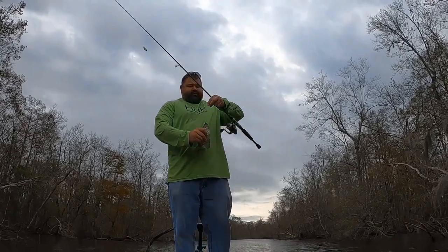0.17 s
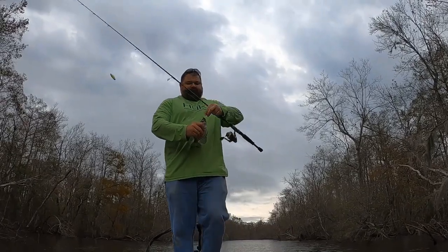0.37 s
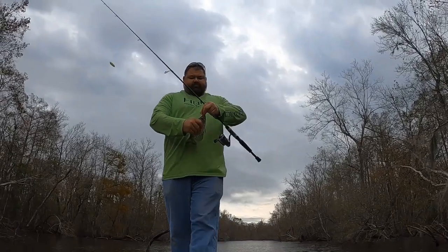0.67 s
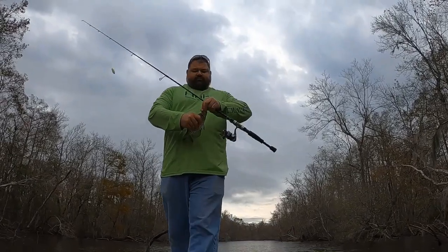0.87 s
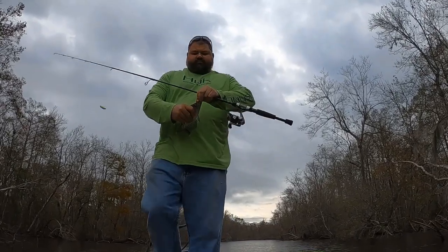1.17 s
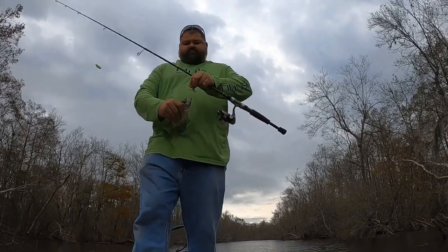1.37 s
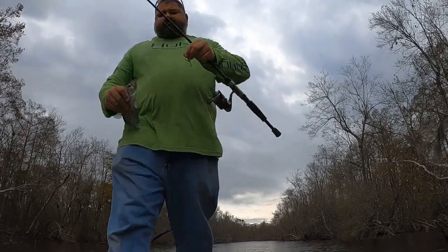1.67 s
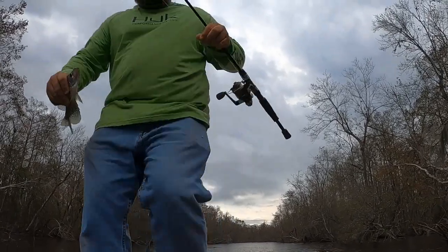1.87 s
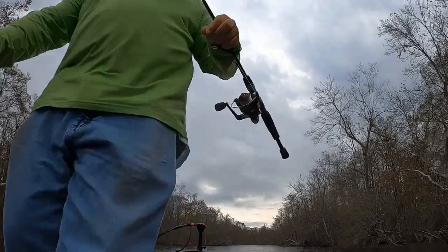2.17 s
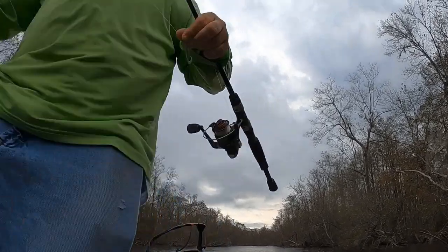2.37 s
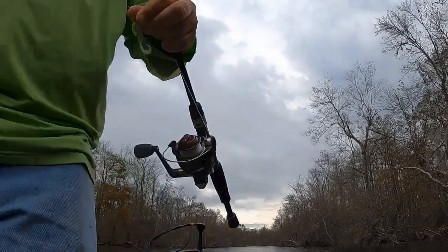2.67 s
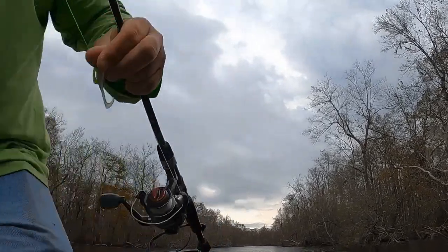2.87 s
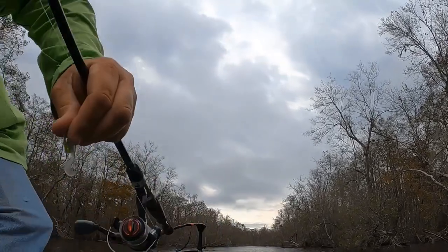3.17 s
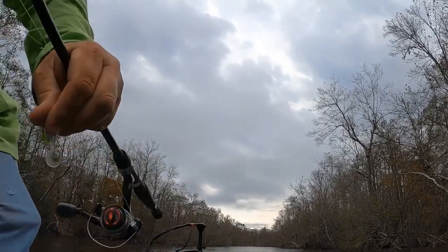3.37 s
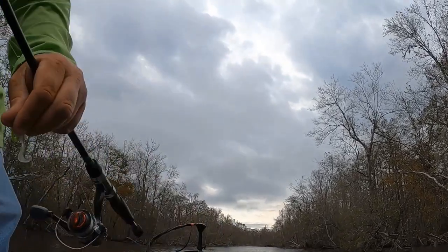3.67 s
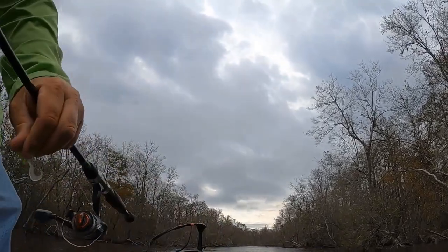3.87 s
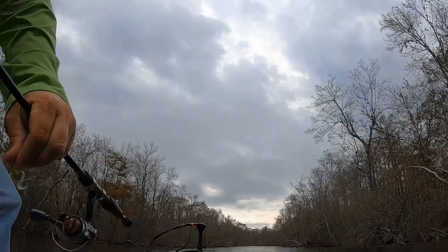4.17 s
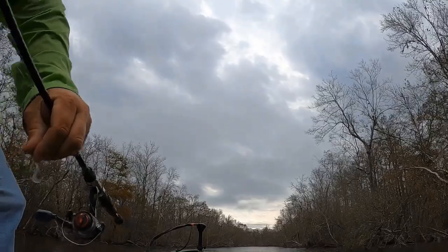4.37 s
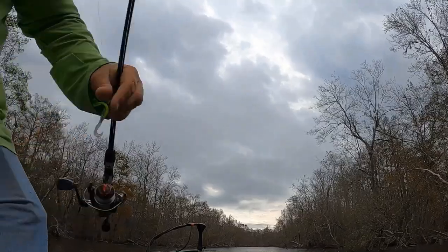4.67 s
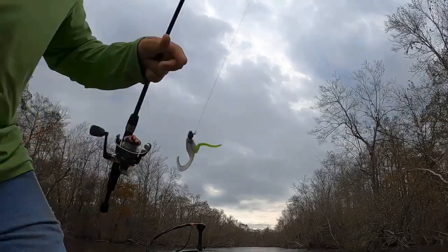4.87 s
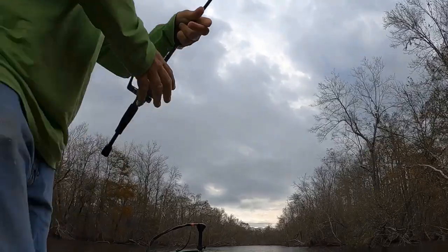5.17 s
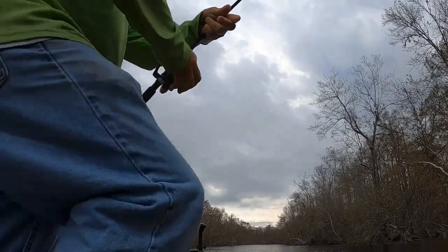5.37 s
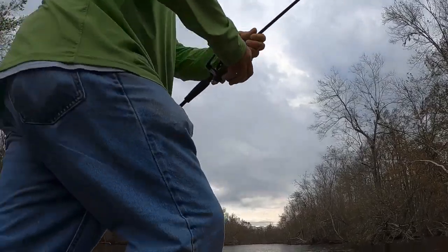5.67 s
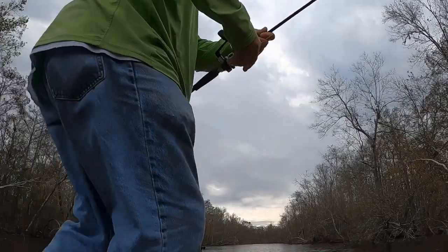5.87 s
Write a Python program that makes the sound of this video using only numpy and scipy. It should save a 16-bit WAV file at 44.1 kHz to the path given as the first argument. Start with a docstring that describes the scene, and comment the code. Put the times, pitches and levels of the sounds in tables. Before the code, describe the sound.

A microphone low on a boat deck picks up faint wind buffeting and a very soft hiss of trees. Spaced footsteps approach and thump the hollow hull, with cloth rustle and small rod and reel clicks. After a brief lull, louder woody knocks and bright rattling cluster at the left, then more knocks and shuffling, a short quieter gap and a last double knock, dry and open.

```python
"""Wind rumbles on the microphone and trees on the banks hiss faintly throughout, as shaped noise.
At first eddies flutter (low sines) among faint tackle clicks, while clothes stir (high noise).
From 1 s an angler walks down a small boat's deck past a camera: decaying modes and noise make each step
crack and boom in the hollow hull, noise swells make scuffs, rustles and hull rumbles.
Rummaging to the left then brings denser knocks, clicks and rattles, made as short coloured rings."""
import sys
import numpy as np
from scipy import signal
from scipy.fft import rfft, irfft, next_fast_len
from scipy.io import wavfile
from scipy.ndimage import map_coordinates

SR = 44100
rng = np.random.default_rng(int(sys.argv[2]) if len(sys.argv) > 2 else 0)


def unload_audio(sound):
    """Save the sound as a 16-bit wav file, at the path given as the first command line argument."""
    columns = np.transpose(np.atleast_2d(sound))
    # keep every value between -1 and 1, then stretch to whole-number steps
    steps = np.round(np.clip(columns, -1, 1) * 32767)
    wavfile.write(sys.argv[1], SR, steps.astype(np.int16))


N = 265349
TIME = np.arange(N) / SR
BLOW = SR // 4  # samples that one blow lasts
LEAD = SR // 25  # samples before contact, where things already brush each other
AGE = (np.arange(BLOW) - LEAD) / SR  # s from contact
SINCE = np.maximum(AGE, 0)

# steps and knocks: t/s, panel level/dB, panel f/Hz, hull boom level/dB, hull f/Hz,
# crack level/dB, crack f/Hz, treble level over the crack/dB; all levels relative
KNOCK_EVENTS = [(1.046, -34, 185, -26.5, 95, -34.5, 1490, -16.5), (1.104, -60, 160, -42, 79, -66, 940, 1),
                (1.758, -36.5, 173, -34, 58, -31, 1220, -9.5), (1.79, -49, 270, -30.5, 45, -59.5, 985, 1),
                (2.379, -33.5, 197, -60, 138, -48, 890, 1), (2.388, -33, 193, -61, 138, -40, 1860, -8),
                (2.414, -39.5, 179, -50, 90.5, -48, 1730, -4), (2.459, -42, 152, -22, 45.5, -54.5, 970, 4),
                (2.491, -41, 153, -23, 43.4, -52, 950, -22), (2.852, -34.5, 304, -18.5, 90.4, -38, 640, -9),
                (2.886, -35.5, 139, -23.5, 73.7, -40.5, 890, -6.5),
                (2.974, -70, 152, -33, 89.3, -65, 1820, 14), (3.124, -63, 198, -56, 100, -56.5, 700, -18),
                (3.338, -23, 374, -32, 92, -32.5, 540, -20),
                (3.434, -22.5, 200, -23.5, 86, -33.5, 1510, -14.5),
                (3.51, -36.5, 204, -47, 57, -40.5, 1290, -13), (3.698, -45, 211, -68, 127, -51, 1080, 4),
                (4.279, -27, 323, -49, 133, -24.5, 970, -12),
                (4.358, -19.5, 261.4, -36.5, 105, -28, 910, -3.5),
                (4.406, -35.5, 481, -53, 95.5, -34, 990, -18),
                (4.437, -22.5, 263, -52, 125, -28.5, 1760, -4),
                (4.446, -26.5, 222, -20, 104, -37, 1240, -20), (4.642, -49, 187, -39.5, 94, -68, 1000, -9),
                (4.728, -35, 242, -43, 108, -29, 880, -13), (4.775, -30, 210, -39, 108, -27, 1180, -3),
                (4.838, -28.5, 470, -50, 90, -27.5, 850, -8),
                (5.129, -46.5, 199, -40.5, 105.6, -55, 1080, -1), (5.161, -69, 162, -39, 77, -58, 1000, -7),
                (5.295, -26.5, 181.6, -28.5, 148, -38, 920, -4),
                (5.351, -24.5, 214, -24.5, 130, -34, 890, -4.5),
                (5.412, -27.5, 474, -33.5, 102, -30, 900, -14.5),
                (5.921, -30, 182, -37, 83.4, -27, 1310, -12.5),
                (5.931, -35.5, 330, -48, 82, -31.5, 734, -25)]
# decay of the struck deck: f/Hz, t60/s
DECK_DECAY = [(150, 0.26), (500, 0.15), (1500, 0.11), (4000, 0.055), (10000, 0.019)]
# spectrum of the panel's crowded modes: f/Hz, level/dB
PANEL_SPECTRUM = [(70, -27.5), (140, -6), (260, 0), (480, -3), (700, -24), (1400, -68)]
# spectrum of the crack's middle: f/Hz, level/dB
CLACK_SPECTRUM = [(300, -40.5), (600, 3.5), (760, 2), (1300, -5), (2200, -6), (3200, -9), (6000, -37)]
# spectrum of the treble edge of hard contacts, in knocks and clicks: f/Hz, level/dB
EDGE_SPECTRUM = [(1400, -54.5), (2600, 2.5), (4400, 9), (6000, -10.5), (9000, -20)]
# spectrum of the highest treble of hard contacts, in knocks and clicks: f/Hz, level/dB
SPARKLE_SPECTRUM = [(3500, -14.5), (5800, 4), (9000, -3.5), (12000, -13), (15500, -22)]
# onset time/s of an even blow, and dB of onset time per dB of softness (panel over crack)
CONTACT_S, SOFTENING = 0.0013, 0.45


def knocks():
    """Modal superposition: a blow cracks on the deck, rings its panel and booms in the hull."""
    track = np.zeros((2, N))
    for s, panel_db, panel_hz, boom_db, hull_hz, crack_db, clack_hz, treble_db in KNOCK_EVENTS:
        contact_s = CONTACT_S * amp(SOFTENING * (panel_db - crack_db))  # soft blows start more slowly
        # deep hull modes last longer
        boom = amp(boom_db - 2.0) * mode(hull_hz, t60=11.6 / hull_hz, rise_s=0.0033)

        low_board = 0.36 * mode(410.7, t60=0.043, rise_s=0.0022)
        high_board = 0.36 * mode(493, t60=0.036, rise_s=0.002)
        boards = (low_board + high_board) * panel_hz / 400  # stronger with a higher panel pitch
        panel_own = [(panel_hz, 110, 7)]
        crowd = 0.5 * dense_ring(PANEL_SPECTRUM, DECK_DECAY, contact_s, snap=3.3, brush=0.1, own=panel_own)
        ring = mode(panel_hz, t60=0.075, rise_s=0.002) + boards + crowd
        panel = amp(panel_db - 1.5) * unit_hit(ring)

        clack_own = [(clack_hz, 330, 9)]
        clack = dense_ring(CLACK_SPECTRUM, DECK_DECAY, contact_s, snap=4.9, brush=0.24, own=clack_own)
        edge = dense_ring(EDGE_SPECTRUM, DECK_DECAY, contact_s, snap=1.6, brush=0.12)
        sparkle = dense_ring(SPARKLE_SPECTRUM, DECK_DECAY, contact_s, snap=1.2, brush=0.16)
        treble = amp(treble_db) * (amp(-10.0) * edge + amp(-20.0) * sparkle)
        crack = amp(crack_db) * (amp(-5.5) * clack + treble)
        add(track, s, boom + panel + crack)
    return track


# clicks of rod, reel and loose tackle: t/s, relative level/dB, ring f/Hz, t60 at the ring pitch/s
CLICK_EVENTS = [(0.167, -65, 1510, 0.027), (0.316, -63, 2300, .06), (.416, -55.5, 1750, 0.13),
                (1.031, -52, 1700, 0.081), (1.1358, -54.5, 3650, 0.11), (1.2029, -52, 1520, 0.093),
                (1.228, -61, 1710, 0.025), (1.347, -50, 3900, .06), (1.421, -34, 4730, 0.054),
                (1.5212, -56.5, 2560, .06), (1.6304, -42.5, 2050, 0.18), (1.752, -39, 2300, 0.041),
                (1.9088, -35, 1820, 0.038), (2.0703, -44.5, 1890, 0.089), (2.135, -59, 1580, 0.11),
                (2.2349, -43, 2720, 0.12), (2.39, -36.5, 1870, 0.048), (2.432, -36.5, 2670, 0.078),
                (2.955, -38, 7000, 0.064), (3.1188, -59, 1790, 0.069), (3.4338, -37, 1460, 0.14),
                (3.7698, -38.5, 2010, 0.086), (3.7861, -27, 4500, 0.061), (4.1, -53, 2130, 0.087),
                (4.204, -32.5, 2690, 0.104), (4.215, -30.5, 5400, 0.027), (4.3008, -22, 2780, 0.067),
                (4.3178, -35.5, 3320, 0.079), (4.4427, -29, 2270, 0.11), (4.5025, -36.5, 4970, 0.075),
                (4.6176, -28.5, 2100, 0.12), (4.6401, -32.5, 2570, 0.045), (4.7619, -34, 1900, 0.11),
                (4.7855, -22.5, 2340, 0.08), (4.85, -31.5, 4000, 0.13), (4.8607, -27.5, 5200, 0.075),
                (4.8843, -23, 3130, 0.071), (4.9353, -32.5, 2680, 0.097), (4.9656, -32, 2420, 0.064),
                (5.068, -39.5, 2830, 0.068), (5.1817, -38, 1690, 0.13), (5.2157, -42, 2140, 0.049),
                (5.288, -40, 1840, 0.21), (5.3963, -30.5, 4700, 0.091), (5.4128, -26.5, 2780, 0.056),
                (5.5118, -37, 1620, 0.12), (5.5561, -31.5, 1520, 0.074), (5.824, -50.5, 3540, .05)]
# how tackle decay varies with pitch, before each click rescales it: f/Hz, relative t60/s
TACKLE_DECAY = [(800, 0.2), (2500, 0.098), (10000, 0.06)]
# registers in the order body, edge, sparkle: centre f/Hz, relative level at the centre/dB
REGISTER_LEVELS = [(1700, -1), (4000, 0.5), (7000, -3)]
# spectrum of a click's body: f/Hz, level/dB
BODY_SPECTRUM = [(200, -6), (600, -0.5), (1400, -4), (2300, -2.5), (3500, -3), (7000, -75)]
FADE_DB_PER_OCTAVE = 9.5  # a register fades as the ring pitch leaves its centre
RING_WIDTH, RING_DB = 0.31, 4.5  # a part's own resonance: width over pitch, and lift in dB
CONTACT_SHARE = 0.0047  # onset time of a click over its t60, before the floor in dense_ring


def tackle():
    """Impact excitation: small hard parts snap brightly, coloured by their own short resonance."""
    track = np.zeros((2, N))
    for s, db, ring_hz, t60 in CLICK_EVENTS:
        body_db, edge_db, sparkle_db = [
            top_db - FADE_DB_PER_OCTAVE * abs(np.log2(ring_hz / hz)) for hz, top_db in REGISTER_LEVELS]
        t60s = np.array(TACKLE_DECAY) * [1, t60 / along(TACKLE_DECAY, ring_hz)]
        contact_s = CONTACT_SHARE * t60
        own = [(ring_hz, RING_WIDTH * ring_hz, RING_DB)]
        body = dense_ring(BODY_SPECTRUM, t60s, contact_s, snap=1.0, brush=0.18, own=own)
        edge = dense_ring(EDGE_SPECTRUM, t60s, contact_s, snap=0.51, brush=0.15, own=own)
        sparkle = dense_ring(SPARKLE_SPECTRUM, t60s, contact_s, snap=0.73, brush=0.26)
        click = amp(body_db - 6.0) * body + amp(edge_db - 12) * edge + amp(sparkle_db - 10.0) * sparkle
        add(track, s, amp(db) * click)
    return track


# the boat sways as weight shifts, and the hull rumbles: peak t/s, relative level/dB, rise to peak from 1/e/s
SWAY_EVENTS = [(.98, -50, .04), (1.08, -33, 0.066), (1.8, -44.5, 0.073), (1.92, -42, 0.053),
               (2.42, -35.5, 0.1), (2.57, -44.5, 0.088), (2.97, -47, .08), (3.45, -47, 0.11),
               (4.03, -48, 0.06), (4.26, -44, 0.046), (4.44, -35, .05), (4.72, -59, .1),
               (5.8, -40.5, 0.023), (6, -39.5, 0.036)]
# soles scuff over the deck: peak t/s, relative level/dB, rise to peak from 1/e/s
SCUFF_EVENTS = [(.46, -63, 0.1), (1.08, -64, 0.12), (1.68, -56.5, 0.049), (1.84, -56, 0.09),
                (2.3, -59, 0.12), (2.41, -46, 0.064), (2.52, -60, 0.062), (3.52, -51.5, 0.05),
                (3.77, -48.5, 0.042), (4.355, -36, 0.024), (4.44, -43.5, 0.054), (4.69, -52, 0.074),
                (4.83, -40, 0.077), (4.98, -49.5, 0.084), (5.27, -54.5, 0.085), (5.35, -42.5, 0.039),
                (5.43, -42, 0.061), (5.78, -59.5, 0.082), (5.955, -53.5, 0.032)]
# sleeves and trousers brush past: peak t/s, relative level/dB, rise to peak from 1/e/s
BRUSH_EVENTS = [(.04, -65, 0.01), (.53, -72.5, 0.19), (2.98, -57, 0.062), (3.635, -54, 0.041),
                (3.72, -54, 0.025), (4.23, -45, .025), (5.25, -49.5, 0.033), (5.58, -51.5, 0.02),
                (5.76, -55.5, 0.056)]
# clothes stir all the time: t/s, relative level/dB
STIRRING_LEVEL = [(0, -76), (1.45, -77.5), (1.7, -65.5), (2.2, -68), (2.7, -66), (3.3, -65), (4.55, -69),
                  (5.1, -63.5), (5.7, -60.5), (6, -70.5)]
# spectrum of hull rumble and wind buffeting: f/Hz, level/dB
RUMBLE_SPECTRUM = [(12, -30.5), (27, -3.5), (40, 4.5), (52, 1.5), (70, -0.5), (110, -7.5), (170, -13),
                   (400, -62.5)]
# spectrum of the creaking deck: f/Hz, level/dB
CREAK_SPECTRUM = [(80, -21), (150, -2.5), (210, -2), (300, -8.5), (480, -17), (700, -29.5), (1500, -42.5)]
# spectrum of soles and the low part of rubbing cloth: f/Hz, level/dB
SCUFF_SPECTRUM = [(300, 5), (600, -3), (1200, -7), (2300, -3.5), (3500, -13.5), (7000, -57)]
# spectrum of hissing cloth: f/Hz, level/dB
CLOTH_SPECTRUM = [(1300, -27), (2600, 2.5), (4400, 5.5), (6000, -2.5), (8500, -5.5), (10000, -12),
                  (12500, -16), (15500, -43)]
MURMUR_DB = -66.5  # steady part of the creaking, relative
# a scuff also makes the deck creak and the trouser leg hiss; a sway creaks too (dB over each)
SCUFF_CREAK_DB, SCUFF_HISS_DB, SWAY_CREAK_DB = 4, -11, -22.5
BRUSH_BODY_DB, STIR_BODY_DB = 6, 1  # low part of a brush and of the stirring, dB over the envelope


def movement():
    """Friction noise: shifting weight stirs hull and deck, soles scuff and cloth rubs."""
    sway, scuffing, brushing = swells(SWAY_EVENTS), swells(SCUFF_EVENTS), swells(BRUSH_EVENTS)
    stirring = amp(curves(STIRRING_LEVEL, TIME)[0])
    left_db, = curves(LEFTWARD, TIME)
    creaking = together(amp(MURMUR_DB), amp(SCUFF_CREAK_DB) * scuffing, amp(SWAY_CREAK_DB) * sway)
    rubbing = together(scuffing, amp(BRUSH_BODY_DB) * brushing, amp(STIR_BODY_DB) * stirring)
    hissing = together(brushing, stirring, amp(SCUFF_HISS_DB) * scuffing)

    # the image leans least in the hull and deck, most of all in the scuff
    hull = sway * rush(RUMBLE_SPECTRUM, grain_db=-1.5, grain_rate=8.7) * pan(0.08 * left_db)
    deck = creaking * rush(CREAK_SPECTRUM, grain_db=4.0, grain_rate=44) * pan(0.12 * left_db)
    scuff_noise = rush(SCUFF_SPECTRUM, grain_db=0.5, grain_rate=59, catches=46, catch_share=1.0)
    scuff = amp(-1.05) * rubbing * scuff_noise * pan(left_db)
    cloth_noise = rush(CLOTH_SPECTRUM, grain_db=1.0, grain_rate=210, catches=140, catch_share=0.57)
    cloth = hissing * cloth_noise * pan(0.52 * left_db)
    strokes = unit(amp(2.76 * wobble(24)))  # rubbing comes in short uneven strokes
    return hull + deck + strokes * (scuff + cloth)


# eddies that hit one microphone port harder: t/s, relative level/dB, f/Hz, left minus right/dB
EDDY_EVENTS = [(0.275, -40.5, 62.4, 15), (0.356, -37.5, 69, 11), (0.451, -41, 96, 2), (0.644, -37, 51, 8),
               (0.95, -33.5, 64, 14), (1.001, -39, 60, 16), (1.34, -39.5, 61, 10), (3.962, -42, 58.5, -18)]
# spectrum of the trees' hiss: f/Hz, level/dB
TREE_SPECTRUM = [(200, -29), (700, 7.5), (1500, 11.5), (3000, -5.5), (5600, -5), (8500, -9.5), (11000, -21),
                 (15000, -42)]
BUFFET_DB, GUST_DB = -54.5, 6.5  # steady wind level, and its random swing


def wind(eddy_s=0.019):
    """Turbulence: wind rumbles on the ports, eddies shake them for a few cycles, far trees hiss."""
    trees = unit(filtered(stereo_noise(N), lambda hz: amp(along(TREE_SPECTRUM, hz))))
    buffeting = rush(RUMBLE_SPECTRUM, grain_db=GUST_DB, grain_rate=8.7) * pan(left_db=2)
    air = amp(-75) * trees + amp(BUFFET_DB) * buffeting
    for s, db, hz, left_db in EDDY_EVENTS:
        flutter = np.sin(2 * np.pi * hz * (TIME - s) + 1.9 * wobble(60))  # phase wanders
        envelope = np.exp(-((TIME - s) / eddy_s) ** 2)
        air += amp(db - 3) * pan(left_db) * flutter * envelope
    return air


# resonances of the deck and its fittings: f/Hz, width/Hz, relative lift/dB
FITTING_MODES = [(469.4, 23, 4), (850, 77, 0.5), (978, 72, 4.5), (1267, 290, 5), (1700, 720, 4),
                 (2490, 80, -0.5), (3410, 290, -1.5), (4360, 730, -3.5)]


def dense_ring(colour, t60s, contact_s, snap, brush, own=()):
    """Statistical modal overlap: a faint brush, a contact burst, then decay at each frequency's own rate."""
    hz, t, z = signal.stft(stereo_noise(BLOW), SR, nperseg=256)
    fade = amp(-60 * np.maximum(t - LEAD / SR, 0) / along(t60s, hz)[:, None])
    tail = signal.istft(z * fade, SR, nperseg=256)[1][:, :BLOW]
    onset = 1 - np.exp(-SINCE / max(contact_s, 1e-4))
    contact = onset * (1 + snap * np.exp(-SINCE / 0.001))
    flicker = map_coordinates(rng.standard_normal(size=150), [SINCE * 260], mode="wrap")
    chatter = amp(1.37 * flicker)  # loose parts rattle on
    brushing = brush * np.exp(-np.abs(AGE) / 0.0094)
    struck = tail * (contact * chatter + brushing)
    gain = lambda hz: colour_gain(colour, hz) * amp(lift_db([*FITTING_MODES, *own], hz) + spot_db(hz))
    return unit_hit(filtered(struck, gain, causal=True))


def mode(hz, t60, rise_s):
    """Damped oscillator: one resonance swells as the blow spreads, then decays exponentially."""
    decay = np.exp(-np.log(1000) * SINCE / t60)
    rise = (1 - np.exp(-SINCE / rise_s)) ** 2
    return unit_hit(np.sin(2 * np.pi * hz * SINCE) * decay * rise)


def rush(colour, grain_db, grain_rate, catches=0, catch_share=0):
    """Stick-slip: rms-1 noise of uneven sliding, plus sudden catches (mean number a second)."""
    sliding = unit(amp(grain_db * wobble(grain_rate)))
    slips = (rng.random(N) < catches / SR) * rng.uniform(0.18, 1, N)
    slips = signal.lfilter([1], [1, -np.exp(-1 / (0.013 * SR))], slips)  # each falls to 1/e in 13 ms
    grains = stereo_noise(N) * (sliding + catch_share * unit(slips))
    gain = lambda hz: colour_gain(colour, hz) * amp(0.92 * lift_db(FITTING_MODES, hz))
    return unit(filtered(grains, gain, causal=True))


RELEASE, SWELL_SHAPE = 1.28, 1.27  # fall over rise in length; shape 1 = pointed, 2 = round


def swells(rows):
    """Energy summation: movements that each build to a peak and ebb add in power."""
    power = np.zeros(N)
    for s, db, rise_s in rows:
        near = np.abs(TIME - s) < 8 * rise_s
        u = (TIME[near] - s) / rise_s
        power[near] += (amp(db) * np.exp(-np.maximum(-u, u / RELEASE) ** SWELL_SHAPE)) ** 2
    return np.sqrt(power)


def together(*gains):
    """Incoherent addition: unrelated sounds add in power."""
    return np.sqrt(sum(gain ** 2 for gain in gains))


# how far the angler is to the left: t/s, left minus right before the share for each band/dB
LEFTWARD = [(0, 4), (1.1, 2.5), (1.4, -2.5), (1.9, 3), (2.4, 3), (3, 5.5), (3.5, 10.5), (4.3, 9), (4.9, 9),
            (5.5, 8.5), (5.9, 2.5)]
# shading by the camera body: f/Hz, share of the level difference
SHADE_SHARE = [(60, 0.058), (150, 0.29), (300, 0.23), (600, 1), (2500, 1), (5000, 0.38), (10000, 0.24)]


def add(track, s, sound):
    """Stereo placement: level shading by frequency places a blow; the louder port gets it a hair later."""
    left_db, = curves(LEFTWARD, s)
    lag = np.array([[.5], [-.5]]) * 1e-5 * left_db  # s
    gain = lambda hz: pan(left_db * along(SHADE_SHARE, hz)) * np.exp(-2j * np.pi * hz * lag)
    placed = filtered(sound, gain)
    start = round(s * SR) - LEAD
    track[:, start:start + BLOW] += placed[:, :N - start]


def pan(left_db):
    """Amplitude panning: left and right gains with a mean of 1."""
    gains = amp(np.array([[.5], [-.5]]) * left_db)
    return gains / gains.mean(0)


# likeness of the two ports: f/Hz, coherence
PORT_COHERENCE = [(100, 0.95), (300, 0.94), (600, 0.74), (1200, 0.58), (4000, 0.28), (12000, 0.091)]


def stereo_noise(size):
    """Spatial coherence: noise at two ports is alike in the bass, less so in the treble."""
    turn = lambda hz: np.arccos(np.clip(along(PORT_COHERENCE, hz), 0, 1)) / 2
    shares = lambda hz: np.array([np.cos(turn(hz)), np.sin(turn(hz))])
    mid, side = filtered(rng.standard_normal((2, size)), shares)
    return np.array([mid + side, mid - side])


def lift_db(resonances, hz):
    """Resonance: summed bell-shaped lifts in dB from rows of f/Hz, width/Hz, lift/dB."""
    return sum(db / (1 + (2 * (hz - centre) / width) ** 2) for centre, width, db in resonances)


def spot_db(hz):
    """Modal participation: every spot that is struck favours its own modes."""
    return 3.5 * map_coordinates(rng.standard_normal(200), [np.sqrt(hz) * .75], mode="wrap")


def colour_gain(points, hz):
    """Spectral envelope: gains that fall a further 24 dB an octave above the last point."""
    octaves_above = np.log2(np.maximum(hz / points[-1][0], 1))
    return amp(along(points, hz) - 24 * octaves_above)


def filtered(x, gain, causal=False):
    """Linear filtering: causal = minimum phase, so nothing sounds before its cause."""
    m = 2 * next_fast_len(x.shape[-1] // 2 + 512)
    response = gain(np.fft.rfftfreq(m, 1 / SR))
    if causal:
        cepstrum = irfft(np.log(response + 1e-6), m)
        fold = np.r_[1, np.full(m // 2 - 1, 2), np.zeros(m // 2)]
        response = np.exp(rfft(cepstrum * fold))
    return irfft(rfft(x, m) * response, m)[..., :x.shape[-1]]


def wobble(rate):
    """Random modulation: a smooth curve with rate knots a second."""
    return map_coordinates(rng.standard_normal(N // 40), [TIME * rate], mode="wrap")


def along(points, hz):
    """Logarithmic frequency scale: (f/Hz, value) points interpolated on a log axis."""
    f, v = np.transpose(points)
    return np.interp(np.log(hz + 1), np.log(f + 1), v)


def curves(rows, at):
    """Linear interpolation: each column after the time, read at the given times."""
    s, *cols = np.transpose(rows)
    return [np.interp(at, s, c) for c in cols]


def amp(db):
    """Level law: decibels to amplitude gain."""
    return 10 ** (np.asarray(db) / 20)


def unit(x):
    """Rms normalisation: scale to rms 1."""
    return x / np.sqrt(np.mean(x ** 2) + 1e-20)


def unit_hit(x):
    """Onset normalisation: the 30 ms after contact get rms 1 in the middle of the stereo image."""
    head = np.atleast_2d(x).mean(0)[LEAD:LEAD + round(.03 * SR)]
    return x / np.sqrt(np.mean(head ** 2) + 1e-20)


def scene():
    """Free-field superposition: everything sums on the open water, with no walls to echo."""
    return knocks() + tackle() + movement() + wind()


def record(dry, low_hz=27, top_hz=15750):
    """Band limiting: the camera thins the deepest rumble and keeps nothing above its upper limit."""
    return filtered(dry, lambda hz: hz ** 3 / np.hypot(hz ** 3, low_hz ** 3) * (hz < top_hz))


dry = scene()
out = record(dry)
unload_audio(out)
```